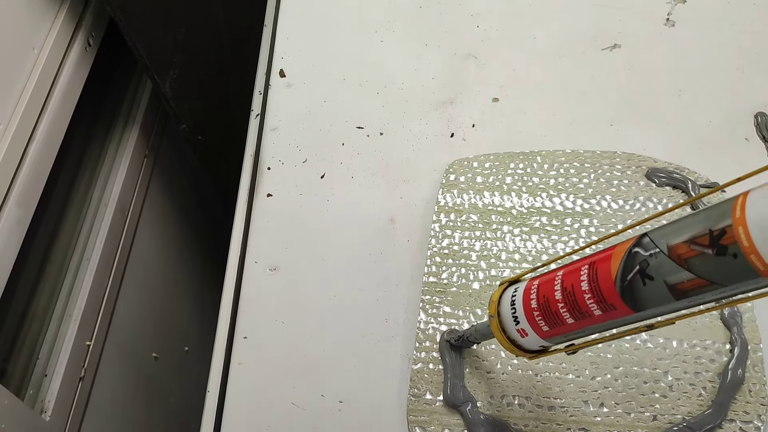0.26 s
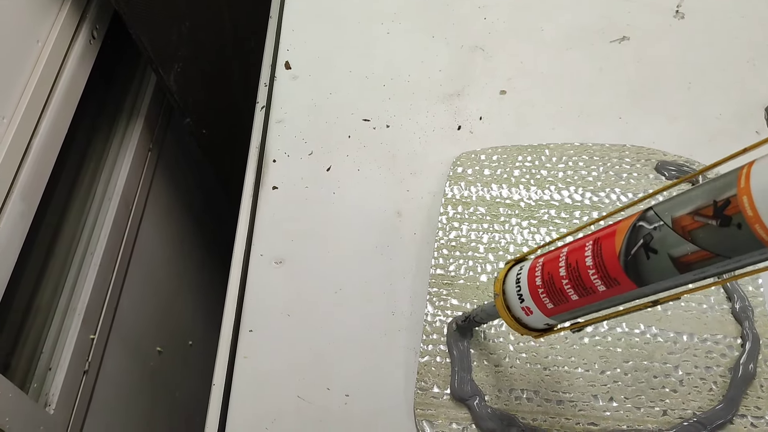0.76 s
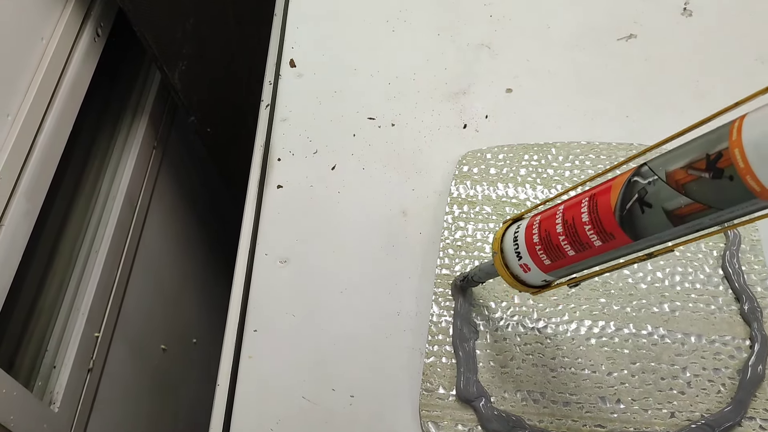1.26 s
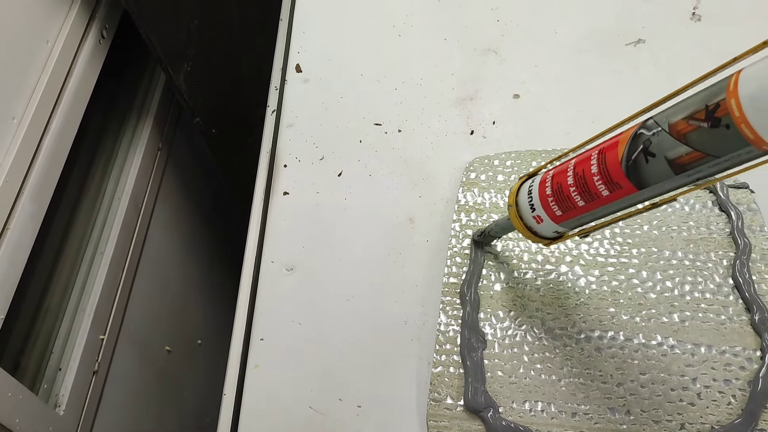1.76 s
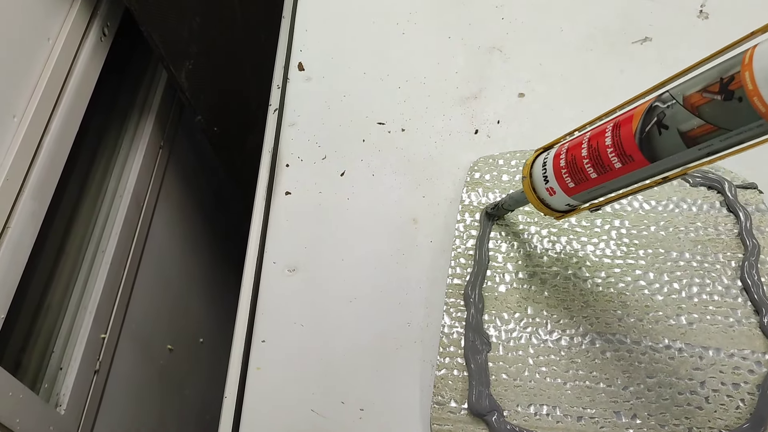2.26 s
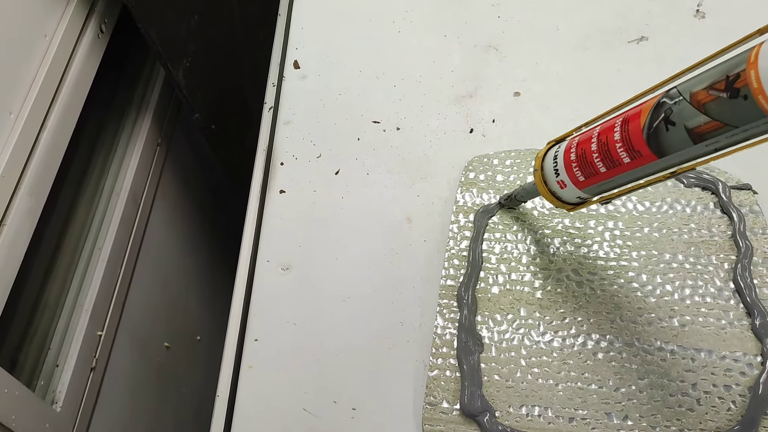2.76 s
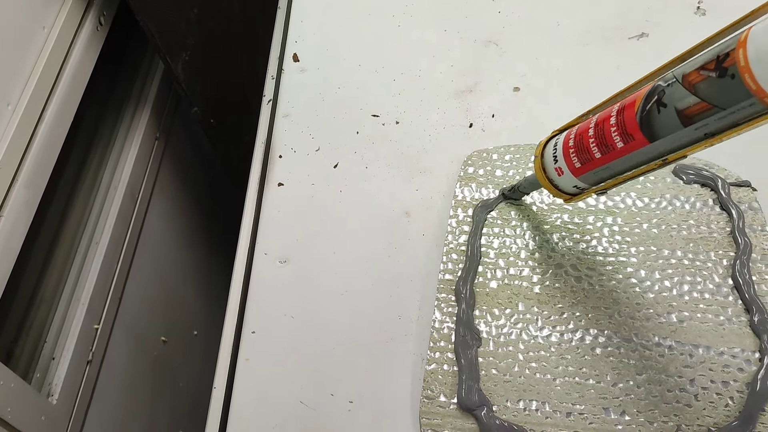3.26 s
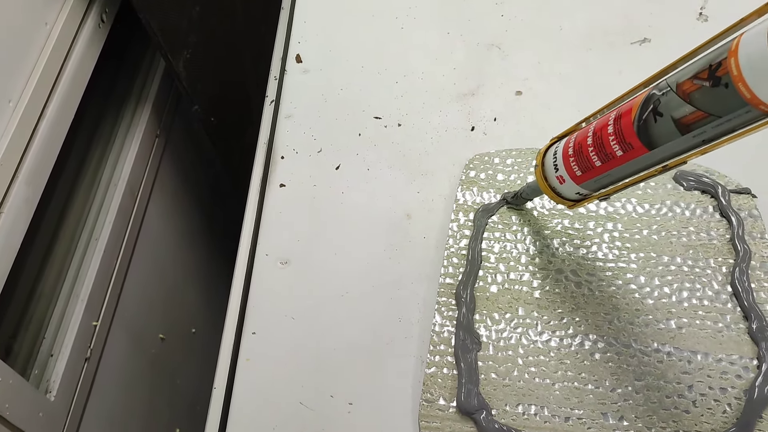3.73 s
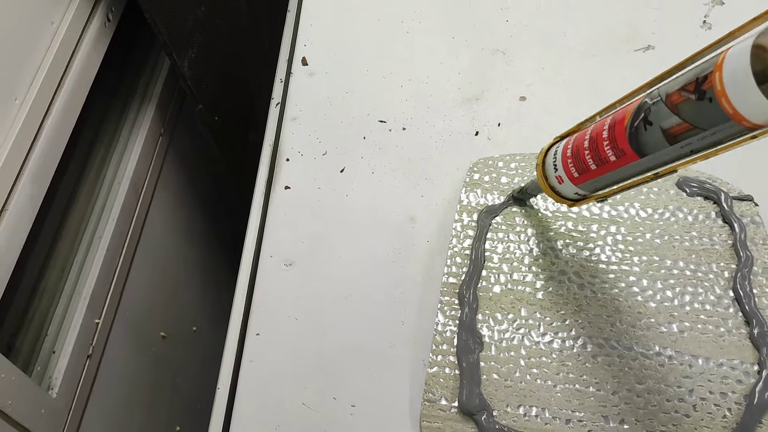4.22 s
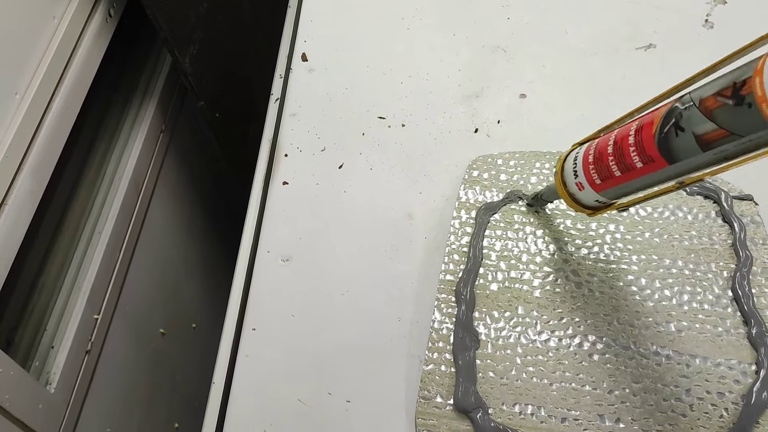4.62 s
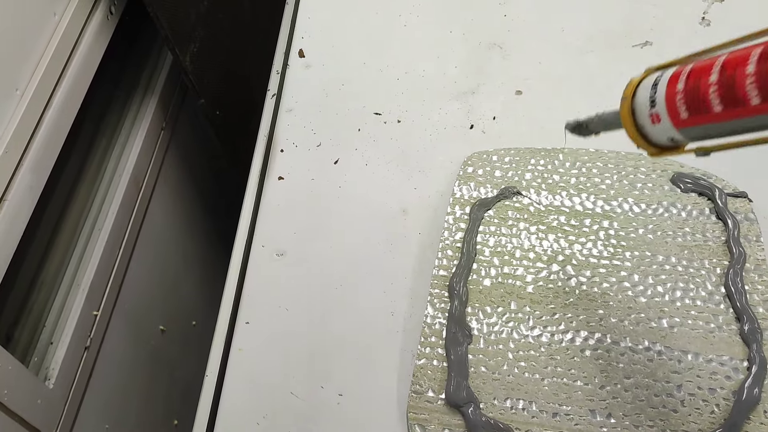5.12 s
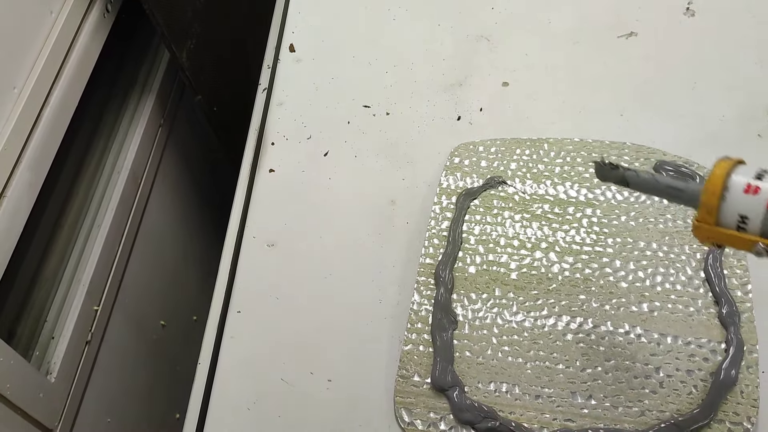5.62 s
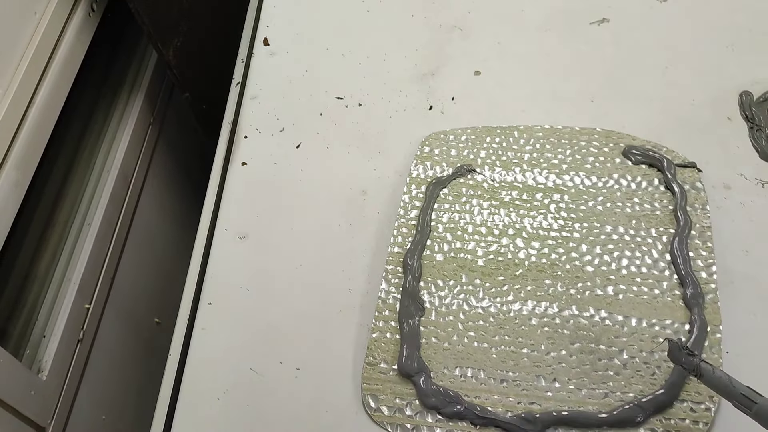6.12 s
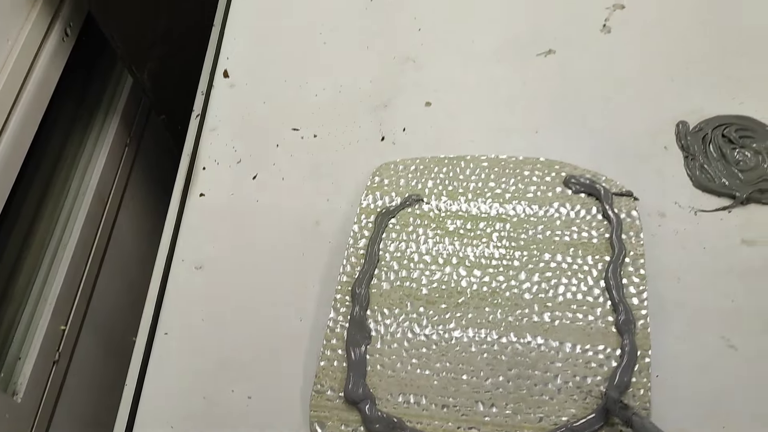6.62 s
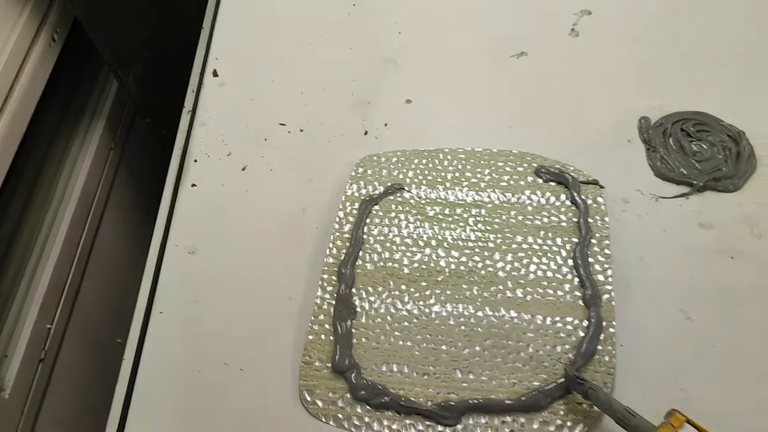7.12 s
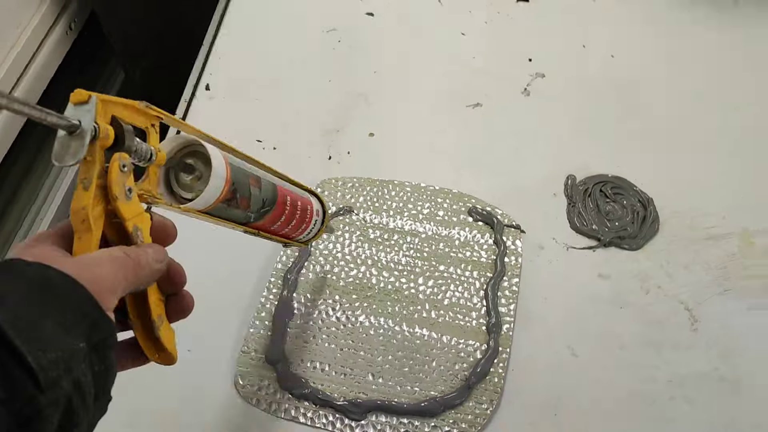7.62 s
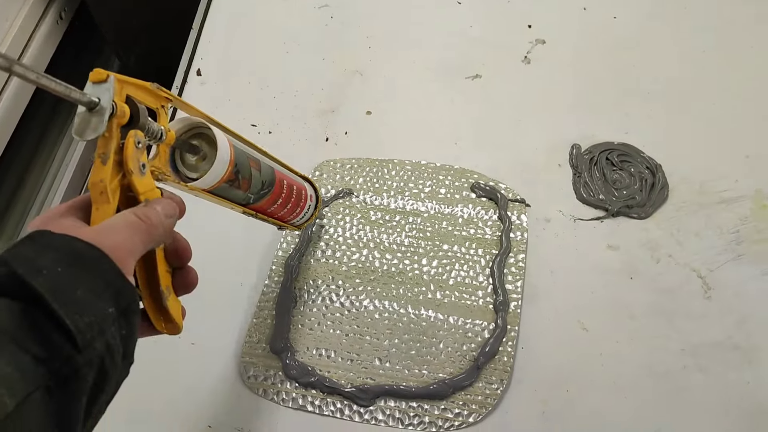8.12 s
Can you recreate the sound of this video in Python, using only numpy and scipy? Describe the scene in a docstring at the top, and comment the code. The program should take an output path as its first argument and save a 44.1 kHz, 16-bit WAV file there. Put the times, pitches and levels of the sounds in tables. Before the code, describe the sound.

Faint steel trigger ticks, a sharp release snap with rattling rod, then heavy hollow bench knocks over a low hum and soft rustle.

```python
"""A steel caulking gun is squeezed over a workbench in a quiet workshop, close to a phone.
The trigger ticks are runs of slips ringing frame modes; the release snaps and the rod rattles and slides.
Knocks add bench modes and bursts of contact noise; sliding parts rub and soft bumps thud.
A diffuse noise tail rings after each sound over a faint hum and rustle of flickering noise bands;
the sound drops out once for a moment."""
import sys
import numpy as np
from scipy import signal
from scipy.io import wavfile
from scipy.ndimage import uniform_filter1d

SR = 44100
rng = np.random.default_rng(int(sys.argv[2]) if len(sys.argv) > 2 else 0)


def waveform_to_disk(signal):
    """Save audio, clipped to [-1, 1], as 16-bit WAV at the path in sys.argv[1]."""
    frames = np.transpose(np.atleast_2d(signal))
    scaled = np.clip(frames, -1, 1) * 32767
    samples = np.round(scaled).astype(np.int16)
    wavfile.write(sys.argv[1], SR, samples)


N = 369558
T = np.arange(SR) / SR  # one second of time [s]
SHORT, LONG = SR // 20, SR // 4  # lengths of a tick and of a blow [samples]
TICK_ROOM_DB = -14

# Modes of the steel gun frame, before the hand damps them: (frequency [Hz], relative level [dB], t60 [s])
FRAME_MODES = [(825, -4.5, 0.1), (988, -10, 0.039), (1225.5, 0.5, 0.055), (1388, -6.5, 0.09),
               (1565, 1, 0.016), (1800, -3.5, 0.043), (2167, -10.5, 0.073), (2454, -5.5, 0.06),
               (2752, -10.5, 0.069), (3060, -9, 0.046), (3480, -11, 0.061), (3900, -11.5, 0.035),
               (4900, -18, .04), (6410, -3, .05)]


def trigger_ticks(direct, send):
    """Single ticks of the trigger and rod, each a short slip that rings the frame."""
    # (time [s], peak before panning [dB], centre of the ring [Hz])
    ticks = [(0.296, -48, 3700), (0.845, -49.5, 1300), (0.8869, -49, 1350), (1.0001, -49, 1300),
             (1.1176, -45.5, 1360), (1.9545, -47, 1800), (1.985, -47.5, 1800), (2.0774, -45.5, 1880),
             (2.1807, -44, 1970), (2.2403, -51, 2040), (2.3303, -44, 1780), (2.4598, -41.5, 1780),
             (2.5092, -43.5, 1920), (2.596, -52, 1900), (2.6249, -47, 1130), (2.6796, -44.5, 1770),
             (2.7225, -51, 1200), (2.7814, -49.5, 1230), (2.787, -55, 3400), (2.8452, -49.5, 1200),
             (2.961, -46, 1260), (2.963, -46.5, 2750), (3.3445, -47.5, 1190), (4.231, -38, 830),
             (6.3654, -38.5, 1180), (6.4517, -36, 1150)]
    for s, db, hz in ticks:
        add(direct, send, s, undb(db) * tick(hz, click_db=-3.0), pan_db=9.5, room_db=TICK_ROOM_DB)


def rod_chatter(direct, send):
    """The loose rod rocks against the frame after a jolt, in ticks that die away."""
    # Separate rocks: (time [s], peak before panning [dB])
    chatter = [(4.3728, -32), (4.425, -38), (4.453, -37), (4.4809, -36), (4.533, -43), (4.557, -45),
               (4.5818, -41), (4.659, -48.5), (4.6786, -50), (4.9705, -31), (5.0278, -31), (5.083, -40),
               (5.1266, -44)]
    # Denser chatter right after the jolt: (time [s], length [s], rate [ticks/s], highest peak at the start [dB])
    rattles = [(4.279, .13, 80, -32), (4.882, .19, 70, -29)]
    rocks = list(chatter)
    for s, length_s, rate, db in rattles:
        gap, size = rng.random((40, 2)).T
        after = np.cumsum((.4 + 1.2 * gap) / rate)
        # peaks fall 55 dB per second and vary by up to 12 dB
        peak_db = db - 55 * after - 12.0 * size
        rocks += [row for row in zip(s + after, peak_db) if row[0] < s + length_s]
    for s, db in rocks:
        add(direct, send, s, undb(db) * tick(1230, click_db=-13), pan_db=7.0, room_db=TICK_ROOM_DB)


def tick(hz, click_db):
    """A short run of slips rings the frame modes near its centre; the hand damps them."""
    weight_db = near(FRAME_MODES, hz, below_db=17.0, above_db=10.0)
    body = ring(FRAME_MODES, weight_db, scatter_db=1.5, push_s=.0008, size=SHORT) * decay(T[:SHORT], .05)
    slips = crackle(.014, .0015, size=SHORT)
    body = peak1(signal.fftconvolve(slips, body)[:SHORT])
    click = burst(hz, 2.2 * hz, .014, .0012, size=SHORT)
    return peak1(body + undb(click_db) * click)


def crackle(t60, rise_s, size):
    """A quick uneven run of tiny slips: noise whose level jumps from sample to sample."""
    t = T[:size]
    slips = rng.standard_normal(size) * undb(3.5 * rng.exponential(size=size))
    return slips * decay(t, t60) * swell(t, rise_s)


def snaps(direct, send):
    """Steel snaps on steel in the damping hand, so the ring is cut very short."""
    # Levels before the trims in blow: (time [s], thud [dB], crack [dB], sizzle [dB], centre of the thud [Hz])
    snap_rows = [(4.1748, -39, -32.5, -20.5, 390), (7.5605, -60, -59, -72, 150),
                 (7.571, -64, -71, -59.5, 207), (7.7655, -66, -61, -71, 191)]
    for s, thud_db, crack_db, sizzle_db, hz in snap_rows:
        levels_db = (thud_db, crack_db - 3.5, crack_db, sizzle_db)
        blow(direct, send, s, levels_db, pan_db=-4, room_db=-8, bench_hz=hz, held_s=.012, contact_s=.013)


def rod_slide(direct, send):
    """The freed rod slides back: one blow with a long scrape of contact noise."""
    # Levels before the trims in blow: (time [s], thud [dB], frame [dB], crack [dB], sizzle [dB])
    slide_row = (4.275, -49, -49, -48, -40)
    blow(direct, send, slide_row[0], slide_row[1:], pan_db=3, room_db=3, bench_hz=340,
         held_s=.44, contact_s=.36, rise_s=.004)


def rubbing(direct, send):
    """Dense uneven slips feed the damped frame modes while a part slides under load."""
    # (start [s], loudest time [s], end [s], loudest level before fade and pan [dB], centre of the ring [Hz])
    rubs = [(.05, .3, .55, -65, 1090), (.66, .74, .84, -63, 2600), (3.75, 4.0, 4.19, -58, 2200),
            (5.65, 5.8, 6.0, -61, 2314), (7.85, 8.3, 8.38, -65, 1713)]
    start_db, end_db = -14, -5  # against the loudest moment
    grip_t60_s, fade_s = .011, .067
    for start, top, end, db, hz in rubs:
        t = np.arange(start, end, 1 / SR)
        slips = rng.standard_normal(len(t)) * undb(2.5 * rng.exponential(size=len(t)))
        weight_db = near(FRAME_MODES, hz, below_db=22.0, above_db=12.0)
        body = ring(FRAME_MODES, weight_db, scatter_db=2.8, push_s=.0008) * decay(T[:LONG], grip_t60_s)
        rub = signal.fftconvolve(slips, body)[:len(t)]
        fade = swell(np.minimum(t - start, end - t), fade_s)
        push_db = db + np.interp(t, [start, top, end], [start_db, 0, end_db])
        add(direct, send, start, rub / rub.std() * undb(push_db) * fade, pan_db=1.5, room_db=-12)


def knocks(direct, send):
    """Knocks of the gun on the bench; contact noise lasts longer when the crack is weak against the frame."""
    # Levels before the trims in blow: (time [s], bench [dB], frame [dB], crack [dB], left minus right [dB],
    # centre of the thud [Hz], room send [dB], t60 that the touch allows [s])
    knock_rows = [(0.6484, -51, -51, -52.5, 4, 232, -10.5, .3), (4.8815, -60, -32, -71, 6, 570, -12, .5),
                  (4.898, -41.5, -34, -69, 8, 210, -6, .2), (5.203, -52, -65, -67, 2, 310, -5, .25),
                  (5.518, -52.5, -64, -67, 3, 315, -7, .25), (6.3765, -17, -38, -64.5, 6, 232, -9, .22),
                  (6.423, -24, -54, -68, 6, 222, -7.5, .4), (6.458, -31.5, -43, -48, 3, 230, -15.5, .25),
                  (6.5446, -23.5, -26.5, -22, 5, 214, -14.5, 1.1),
                  (6.587, -19.5, -38.5, -38.5, -7, 250, -5.5, .96),
                  (6.8675, -18, -23.5, -28.5, 2, 307, -8, .28), (7.398, -46, -58, -59.5, 3, 285, -6, .2)]
    contact_t60_s, softer_db = .019, 21  # contact time at equal levels; it doubles per softer_db
    for s, bench_db, frame_db, crack_db, pan_db, hz, room_db, held_s in knock_rows:
        sizzle_db = max(crack_db - 3.5, frame_db - 23)
        contact_s = contact_t60_s * 2 ** ((frame_db - crack_db) / softer_db)
        levels_db = (bench_db, frame_db, crack_db, sizzle_db)
        blow(direct, send, s, levels_db, pan_db, room_db, hz, held_s, contact_s)


def bumps(direct, send):
    """Soft dull bumps on the bench: a damped thud with no click."""
    # (time [s], onset level before panning [dB], centre of the thud [Hz])
    bump_rows = [(.948, -62, 140), (2.636, -60, 200)]
    for s, db, hz in bump_rows:
        held = decay(T[:LONG], .05)
        add(direct, send, s, undb(db) * thud(hz, held), pan_db=1.5, room_db=-14)


def blow(direct, send, s, levels_db, pan_db, room_db, bench_hz, held_s, contact_s, rise_s=.0022):
    """Bench top, gun frame and the crack of contact in the shares of one blow."""
    bench_db, frame_db, crack_db, sizzle_db = levels_db
    held, contact_s = decay(T[:LONG], max(held_s, .01)), max(contact_s, .005)
    add(direct, send, s, undb(bench_db) * thud(bench_hz, held), pan_db / 4, room_db)

    weight_db = near(FRAME_MODES, 1150, below_db=8.0, above_db=17.0)
    clang = onset1(ring(FRAME_MODES, weight_db, scatter_db=2.5, push_s=.003) * held)
    add(direct, send, s, undb(frame_db - 1.2) * clang, pan_db, room_db)

    # the crack wakes the upper frame modes
    crack_lo_hz, crack_hi_hz = 2050, 4000
    weight_db = near(FRAME_MODES, 3000, below_db=9.0, above_db=3.0)
    upper = ring(FRAME_MODES, weight_db, scatter_db=2.5, push_s=.0002) * decay(T[:LONG], .018)
    slips = crackle(contact_s, rise_s, size=LONG)
    chime = undb(crack_db - 0.6) * onset1(signal.fftconvolve(slips, upper)[:LONG])
    add(direct, send, s, chime, pan_db, room_db, evenly(chime, crack_lo_hz, crack_hi_hz, contact_s))

    contact_bands = ((frame_db, 600, crack_lo_hz), (crack_db, crack_lo_hz, crack_hi_hz),
                     (sizzle_db, crack_hi_hz, 16000))
    for db, lo_hz, hi_hz in contact_bands:
        # each port hears the scattered crack in its own way
        both, left, right = (onset1(burst(lo_hz, hi_hz, contact_s, rise_s)) for _ in range(3))
        crack = undb(db - 5.5) * (both + np.array([left, right]))
        add(direct, send, s, crack, pan_db, room_db, evenly(crack, lo_hz, hi_hz, contact_s))


def thud(bench_hz, held):
    """The board first gives way under the blow, then rings; a lower thud takes longer to build up."""
    # Modes of the bench top, before the touch damps them: (frequency [Hz], relative level [dB], t60 [s])
    bench_modes = [(137, -6, .15), (161.5, 0.6, 0.21), (220, -2, 0.19), (273.5, -1, 0.078),
                   (312, -3, 0.028), (404, -11.5, 0.16), (464, -8, 0.11), (510, -12, 0.13),
                   (620, -8.5, 0.1), (680, -4.5, 0.1)]
    t = T[:LONG]
    give = np.sin(2 * np.pi * bench_hz * t) * decay(t, 3.8 / bench_hz) * swell(t, 1.3 / bench_hz)
    weight_db = near(bench_modes, bench_hz, below_db=2.9, above_db=5.3)
    board = ring(bench_modes, weight_db, scatter_db=2.3, push_s=2.1 / bench_hz, shift=.004)
    return onset1((board + 1.5 * peak1(give)) * held)


def ring(modes, extra_db, scatter_db, push_s, shift=.012, size=LONG):
    """Modes set off by one push; every blow wakes them in other shares and slightly detuned."""
    hz, db, t60 = (c[:, None] for c in np.transpose(modes))
    t = T[:size]
    chance = rng.standard_normal((2, *hz.shape))
    share = undb(db + extra_db + scatter_db * chance[0])
    detuned_hz = hz * (1 + shift * chance[1])
    tones = (share * np.sin(2 * np.pi * detuned_hz * t) * decay(t, t60)).sum(axis=0)
    return peak1(tones * swell(t, push_s))


def near(modes, hz, below_db, above_db):
    """Level of each mode [dB], falling by so much per octave below or above a centre."""
    octaves = np.log2(np.array(modes)[:, :1] / hz)
    return np.where(octaves < 0, below_db * octaves, -above_db * octaves)


def burst(lo_hz, hi_hz, t60, rise_s, size=LONG):
    """The noisy instant of contact: a band of swelling and decaying noise."""
    t = T[:size]
    noise = rng.standard_normal(len(t)) * decay(t, t60) * swell(t, rise_s)
    return peak1(band(noise, lo_hz, hi_hz))


def evenly(sound, lo_hz, hi_hz, contact_s):
    """Over all directions a short blow fills its band evenly, as a plain click; a long scrape already does."""
    if contact_s > .05:
        return sound if sound.ndim == 1 else sound[0]
    click = band(signal.unit_impulse(sound.shape[-1]), lo_hz, hi_hz)
    return click * sound.std() / click.std()


def add(direct, send, s, sound, pan_db, room_db, spread=None):
    """Places a sound left and right; the walls hear it (or its spread to all sides) and keep part of its side."""
    i = int(s * SR)
    side_db = np.array([[pan_db / 2], [-pan_db / 2]])
    spread = sound if spread is None else spread
    direct[:, i:i + sound.shape[-1]] += sound[..., :N - i] * undb(side_db)
    send[:, i:i + len(spread)] += spread[:N - i] * undb(room_db + 0.31 * side_db)


def undb(db):
    """Amplitude of a level in dB."""
    return 10 ** (np.asarray(db) / 20)


def decay(t, t60):
    """Exponential fall of 60 dB in t60 seconds."""
    return np.exp(-np.log(1000) * t / t60)


def swell(t, rise_s):
    """Smooth rise from 0 to 1 over rise_s."""
    return np.sin(np.pi / 2 * np.minimum(t / rise_s, 1)) ** 2


def band(x, lo_hz, hi_hz, order=2):
    """Butterworth band-pass."""
    edges_hz = [lo_hz, min(hi_hz, .45 * SR)]
    return signal.sosfilt(signal.butter(order, edges_hz, "band", fs=SR, output="sos"), x)


def peak1(x):
    """Scales to a peak of 1."""
    return x / np.abs(x).max()


def onset1(x):
    """Scales to a standard deviation of 1 over the first 20 ms."""
    return x / x[:SR // 50].std()


def workshop(send):
    """A diffuse noise tail, octave by octave, with grainy level steps and a 6 ms build-up."""
    # (octave centre [Hz], relative level [dB], t60 [s])
    room_octaves = [(100, -2.5, 0.67), (193, -3, 0.61), (411, 3, 0.58), (781, 4.5, 0.55), (1668, 2.5, 0.54),
                    (3130, 0.4, 0.54), (6610, 5.5, 0.47), (12400, 6.5, 0.27)]
    grain = undb(2.5 * rng.standard_normal(SR // 150).repeat(150))
    tail = sum(undb(db) * stereo_noise(hz, 0.84, count=SR) * decay(T, t60) for hz, db, t60 in room_octaves)
    tail = tail * grain * np.minimum(T / 0.0061, 1) / np.sqrt(SR / 20)
    return signal.fftconvolve(send, tail, axes=1)[:, :N]


def background():
    """Half-octave noise bands that flicker alone; the hum swell weighs most in the bass, rustle in the treble."""
    # Colour of the air noise: (frequency [Hz], relative density [dB per Hz])
    air_colour = [(25, -4), (114, -2), (277, -2.5), (354, -4.5), (451, -9.5), (1520, -14), (2480, -13),
                  (3080, -16), (5880, -23), (8140, -24.5), (10400, -28), (16000, -21.5)]
    # Swells before the band weights below: (time [s], hum [dB], rustle [dB])
    floor_swell = [(0, 0.5, 7.5), (.7, 0.5, 1.5), (1.7, 0, 10.5), (2.3, 0.5, 4.5), (3.2, 1, 3),
                   (3.9, 0.5, -3), (4.7, 4.5, 10), (5.3, 0.5, 12), (7.2, 4, 10), (7.58, 2, 1),
                   (7.75, -4.5, 17.5), (8.0, 2.5, 14), (8.38, 1, 8)]
    air_db = -66  # all bands together, before swells and flicker
    s, hum_db, rustle_db = np.transpose(floor_swell)
    hum_db, rustle_db = (np.interp(np.arange(N) / SR, s, c) for c in (hum_db, rustle_db))
    centres = 30 * 2 ** np.arange(0, 9.2, .5)
    air_hz, density_db = np.transpose(air_colour)
    colour_db = np.interp(np.log(centres), np.log(air_hz), density_db)
    # wider bands carry more power; together they give the level of the air
    colour_db = colour_db + 10 * np.log10(centres)
    colour_db = colour_db + air_db - 10 * np.log10(np.sum(undb(2 * colour_db)))
    out = 0
    for hz, db in zip(centres, colour_db):
        high = np.clip(np.log2(hz / 800) / 5.36, 0, 1)
        pair = stereo_noise(hz, 0.53, count=N)
        # the hum swell counts double up to 800 Hz and less above, where the rustle joins in
        level_db = db + (2 - high) * hum_db + high * rustle_db + 2.0 * walk(11)
        out = out + undb(level_db) * pair / pair.std()
    return out


def walk(rate):
    """Random levels held 1 / rate s and slewed twice."""
    k = int(SR / rate)
    steps = np.repeat(rng.standard_normal(N // k + 1), k)
    return 1.3 * uniform_filter1d(uniform_filter1d(steps, k), k)[:N]


def stereo_noise(hz, octaves, count):
    """A band of diffuse noise, much alike at both ports only in the bass."""
    # (frequency [Hz], left-right correlation of diffuse sound [-1..1])
    likeness = [(60, 0.6), (400, 0.84), (1200, 0.054), (12000, 0.084)]
    like_hz, correlation = np.transpose(likeness)
    like = np.clip(np.interp(np.log(hz), np.log(like_hz), correlation), 0, 1)
    half = 2 ** (octaves / 2)
    mid, side = band(rng.standard_normal((2, count)), hz / half, hz * half)
    return np.sqrt(1 + like) * mid + np.sqrt(1 - like) * side * np.array([[1], [-1]])


def scene():
    """All sources heard directly, their ring in the room, and the background."""
    direct, send = np.zeros((2, 2, N))
    for source in (trigger_ticks, rod_chatter, rubbing, knocks, snaps, rod_slide, bumps):
        source(direct, send)
    # the left port lies further from the bench, so it hears 11 samples later
    direct = np.array([np.roll(direct[0], 11), direct[1]])
    return direct + workshop(send) + background()


def record(dry):
    """The ports dip twice in the treble; the phone rounds peaks, goes silent for a moment, drifts, cuts the top."""
    # (centre [Hz], width [Hz], share of the band taken out [0..1])
    port_dips = [(5700, 900, 0.4), (10260, 3000, 0.39)]
    # Each port's signal swings off zero and creeps back, before slight smoothing:
    # (time [s], left amplitude, right amplitude, time out [s], time back [s])
    drift_swings = [(4.1759, .14, .16, .0007, .0008), (4.1768, -.015, -.12, .0007, .003),
                    (4.177, 0, -.026, .008, .075), (4.262, -.018, .019, .04, .45),
                    (4.37, .008, .006, .008, .9), (7.655, .0022, .0022, .12, .45)]
    stop, start, out_s, in_s = 7.608, 7.655, .0024, .041  # dropout and its fades [s]
    top_hz = 15900
    for hz, width_hz, share in port_dips:
        dry = dry - share * band(dry, hz - width_hz / 2, hz + width_hz / 2, order=1)
    t = np.arange(N) / SR
    gate = np.interp(t, [stop - out_s, stop, start, start + in_s], [1, 0, 0, 1])
    drift = 0
    for s, left, right, away_s, back_s in drift_swings:
        swing = np.interp(t, [s, s + away_s, s + away_s + back_s], [0, 1, 0])
        drift = drift + swing * np.array([[left], [right]])
    drift = uniform_filter1d(drift, size=16)
    low_pass = signal.ellip(8, .2, 80, top_hz, fs=SR, output="sos")
    return signal.sosfilt(low_pass, np.tanh(dry) * gate + drift)


dry = scene()
out = record(dry)
waveform_to_disk(out)
```